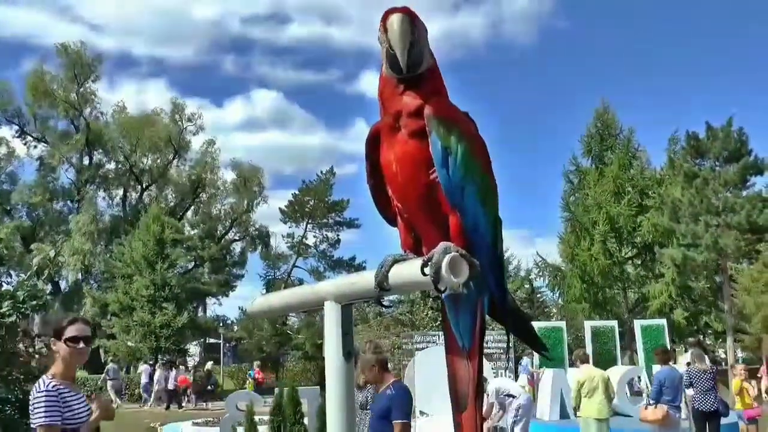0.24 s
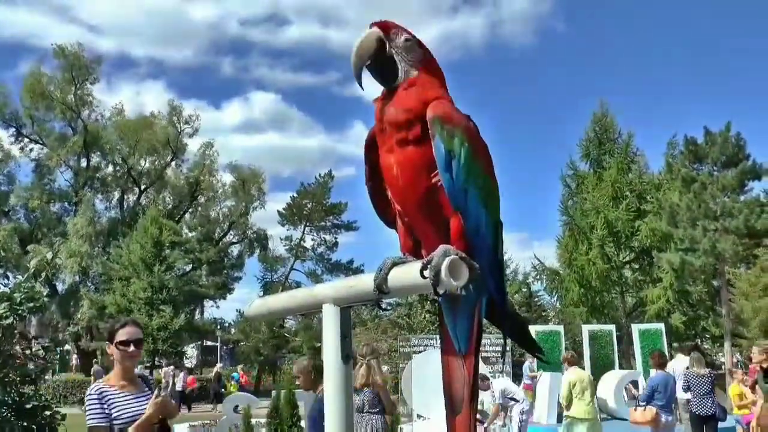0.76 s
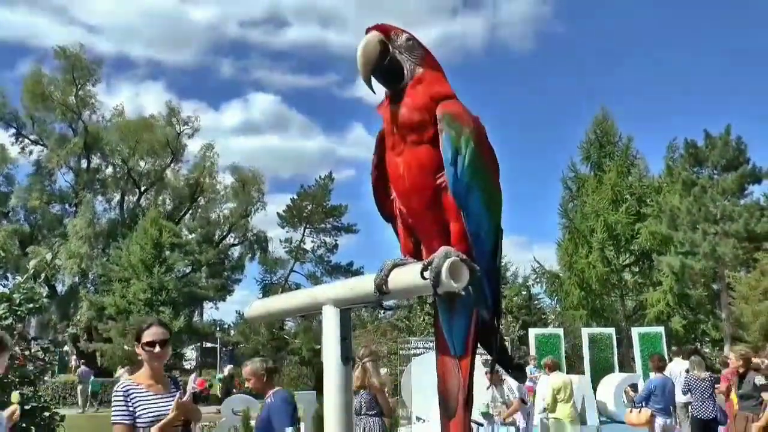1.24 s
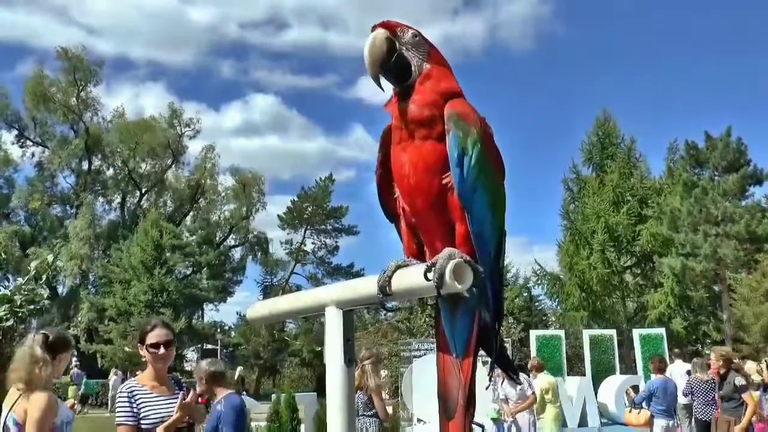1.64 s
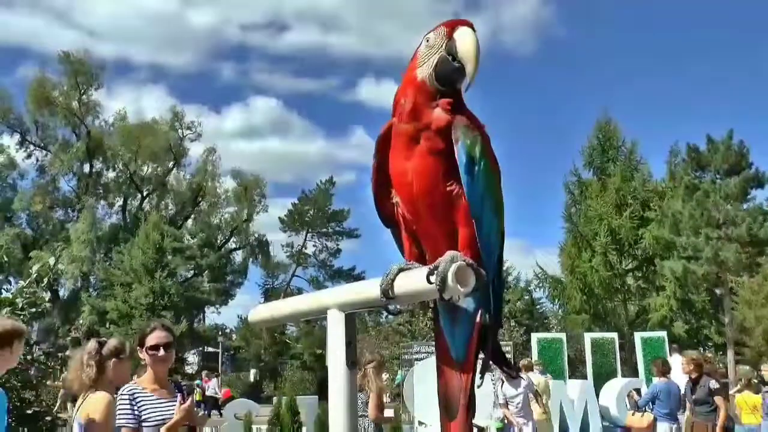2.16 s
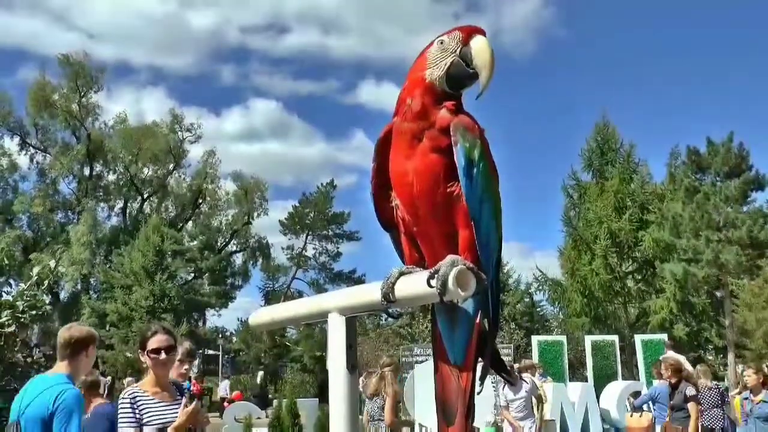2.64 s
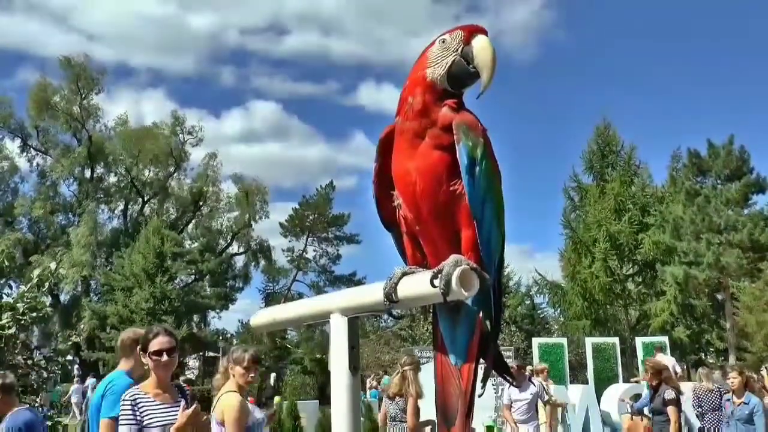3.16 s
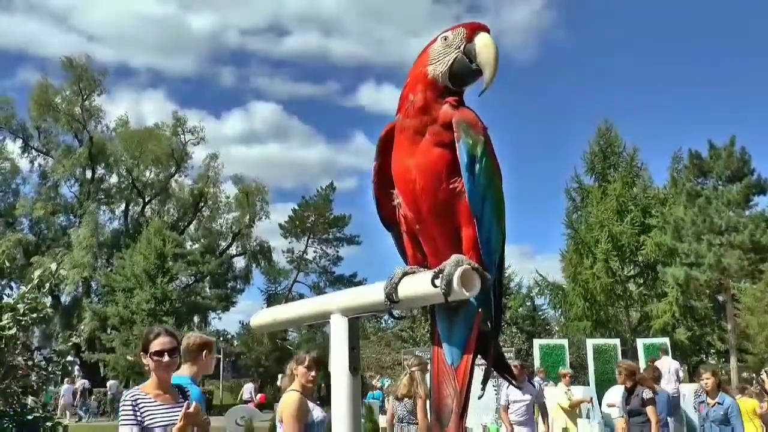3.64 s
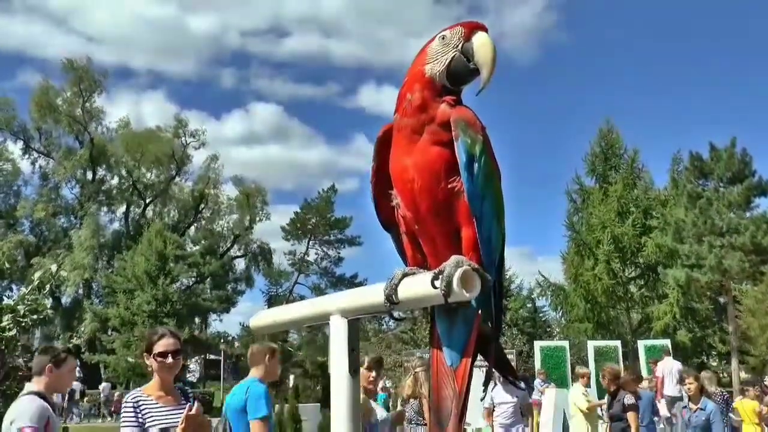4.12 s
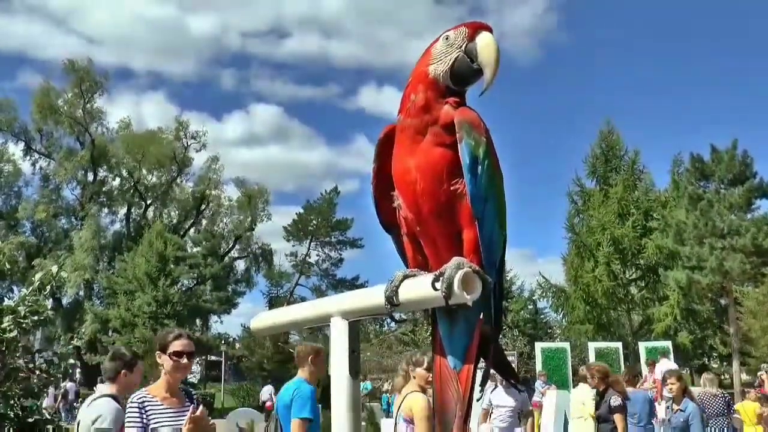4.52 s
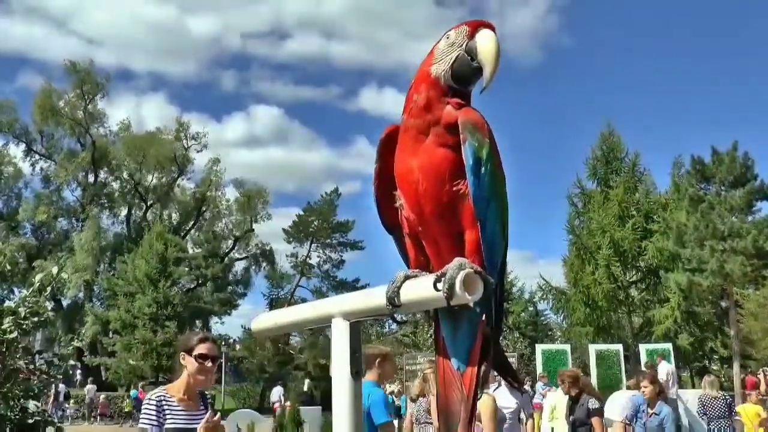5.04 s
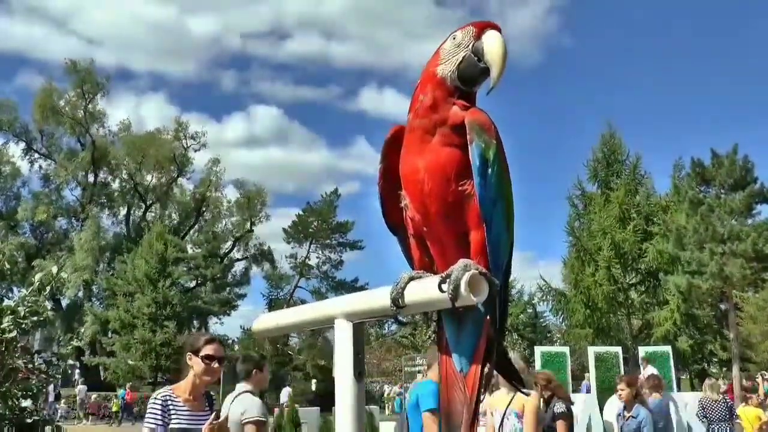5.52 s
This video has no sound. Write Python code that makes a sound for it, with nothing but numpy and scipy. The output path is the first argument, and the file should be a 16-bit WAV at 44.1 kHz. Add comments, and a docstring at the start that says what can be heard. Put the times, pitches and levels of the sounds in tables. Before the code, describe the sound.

A close macaw screech is already ending as the sound begins, its echo dying away into faint calls and still air. At about 1.2 seconds a nearby bird gives a low warble that climbs, trills and drops back, while a distant flock swells into blurred chatter. Short piping notes come around 1.6 seconds, then a harsh, raspy screech at 1.8. Tumbling squawks, more piping and a couple of thin, very high peeps crowd together until about 3.1 seconds. The flock then fades to soft, scattered calls. Another loud, rasping screech cuts through at about 4.2 seconds, followed by a brief high chirp. From 5 seconds to the end, near 5.8, quieter calls slide downward. The near birds sit slightly left of centre at the stereo microphone. The hard walls of a large aviary give each call a short echo, over a faint hiss.

```python
"""Parrots in a large aviary

Macaws screech close to the stereo microphone; other birds chatter, warble, pipe and peep around them.
Each note is a gliding reed tone coloured by the throat, and air rasps through the beak in a full screech.
Hard walls draw the calls out over the blur of the far flock, a faint hiss and still air."""
import sys
import numpy as np
from scipy import signal
from scipy.fft import rfft, irfft
from scipy.io import wavfile
from scipy.ndimage import uniform_filter1d

SR = 44100
rng = np.random.default_rng(int(sys.argv[2]) if len(sys.argv) > 2 else 0)


def output_pcm(signal):
    """Save a mono or channel-first signal as 16-bit PCM at the path in sys.argv[1].

    Samples are clipped to [-1, 1] before scaling.
    """
    pcm = np.clip(np.atleast_2d(signal).T, -1, 1) * 32767
    wavfile.write(sys.argv[1], SR, np.round(pcm).astype(np.int16))


N = 254898
LEAD_S = .3  # the birds are already calling before time zero
SPAN = N + int(LEAD_S * SR)
TOP_HZ = 15600

# Rise and fall of the far flock: time_s, level_db
FLOCK_LOUDNESS = [(0.0, -43.5), (0.19, -78), (0.4, -66), (0.9, -51), (1.29, -40), (1.48, -31),
                  (1.82, -31.5), (2.62, -38), (2.99, -40), (3.32, -52), (4.298, -50.5), (4.43, -54.5),
                  (4.72, -60.5), (5.34, -49), (5.78, -50.5)]


def undb(db):
    return 10 ** (np.asarray(db) / 20)


def on_log(hz, table):
    """Reads a table of frequency_hz, value on a log-frequency axis."""
    at, value = np.transpose(table)
    return np.interp(np.log(np.maximum(hz, 1)), np.log(at), value)


def unit(x):
    return x / np.sqrt(np.mean(x ** 2))


def coloured(size, spectrum):
    """Noise with the given spectrum, rms 1."""
    gain = undb(on_log(np.fft.rfftfreq(size, 1 / SR), spectrum))
    return unit(irfft(rfft(rng.standard_normal(size)) * gain, size))


def walk(size, rate):
    """Smooth random motion that changes about rate times a second, rms 1."""
    window = max(int(SR / rate), 1)
    smooth = uniform_filter1d(rng.standard_normal(size), window, mode="wrap")
    return unit(uniform_filter1d(smooth, window, mode="wrap"))


def place(out, sound, start_s, pan_db=2.5, rise_s=.0088):
    """Adds a sound with soft ends; pan_db is left minus right."""
    i, t = int((start_s + LEAD_S) * SR), np.arange(len(sound)) / SR
    ramp = np.clip(np.minimum(t / rise_s, (t[-1] - t) / .0042), 0, 1)
    out[:, i:i + len(sound)] += sound * np.sin(np.pi / 2 * ramp) ** 2 * undb([[pan_db / 2], [-pan_db / 2]])


def bed(spectrum, swell_db, flicker_db, width):
    """Stereo noise in bands two thirds of an octave apart, each swelling and flickering on its own."""
    out, hz = 0, np.fft.rfftfreq(N, 1 / SR)
    mid, side = rfft(rng.standard_normal((2, N))) * undb(on_log(hz, spectrum))
    pair = mid + width * side * np.array([[1], [-1]])
    lowest_hz, step = spectrum[0][0], 16
    points = N // step + 1
    for centre in lowest_hz * 2 ** np.arange(0, np.log2(TOP_HZ / lowest_hz), 2 / 3):
        octaves = np.log2(np.maximum(hz, 1) / centre)
        band = np.cos(np.pi / 2 * np.clip(1.5 * octaves, -1, 1)) ** 2
        swell = undb(swell_db * walk(points, 2 * step) + flicker_db * walk(points, 11 * step))
        out = out + np.repeat(swell, step)[:N] * irfft(band * pair, N)
    return unit(out) * undb([[1.2], [-1.2]])


def still_air():
    """The quiet room tone of the aviary."""
    # Colour of the air: frequency_hz, level_db
    spectrum = [(15, -55), (25, -21.5), (140, -15.5), (433, -4.5), (567, -4.5), (919, -2), (3930, -18),
                (4260, -11), (5280, -19), (9300, -28.5), (15500, -49.5)]
    return undb(-59) * bed(spectrum, swell_db=2, flicker_db=1.5, width=.9)


def treble_hiss():
    """A faint, wide hiss that comes and goes."""
    # Colour of the hiss: frequency_hz, level_db
    spectrum = [(5000, -20), (7000, 0), (11000, 0), (14000, 0), (15500, -14)]
    # Its rise and fall: time_s, level_db
    loudness = [(0., -77), (.45, -71), (.7, -94), (1.15, -65.5), (2.5, -66.5), (3.6, -66), (4.1, -83),
                (5., -65.5), (5.78, -69)]
    level_db = np.interp(np.arange(N) / SR, *np.transpose(loudness))
    return undb(level_db) * bed(spectrum, swell_db=2, flicker_db=2.5, width=1.1)


def far_flock():
    """Distant birds, blurred by the hall into flickering noise."""
    # Colour of the flock: frequency_hz, level_db
    spectrum = [(240, -50), (400, -26), (738, -5), (874, -22), (1180, 7.5), (1610, 3), (3340, -4.5),
                (4450, -26), (9000, -25), (11700, -24.5), (19800, -120)]
    level_db = np.interp(np.arange(N) / SR, *np.transpose(FLOCK_LOUDNESS)) - 12
    return undb(level_db) * bed(spectrum, swell_db=1.5, flicker_db=5, width=.68)


def hall(dry):
    """Hard walls return dense echoes that ring longest in the midrange."""
    # Time the echoes take to fall 60 dB: frequency_hz, decay_s
    decay = [(300, 0.45), (1000, 0.87), (3000, 0.73), (6000, 0.66), (13000, 0.38)]
    # Echo power common to both channels: frequency_hz, share
    likeness = [(400, 0.41), (1200, 0.11), (4000, 0.57), (12000, .05)]
    first_wall_s = .0039
    hz, t, cells = signal.stft(rng.standard_normal((3, int(1.2 * SR))), SR, nperseg=256)
    cells = cells * undb(-60 * t / on_log(hz, decay)[:, None])
    share = np.clip(on_log(hz, likeness), 0, 1)[:, None]
    tail = signal.istft(np.sqrt(share) * cells[0] + np.sqrt(1 - share) * cells[1:], SR, nperseg=256)[1]
    tail *= np.clip(np.arange(tail.shape[1]) / SR / first_wall_s - 1, 0, 1)
    tail /= np.sqrt(np.sum(tail ** 2, axis=1, keepdims=True))
    return undb(-1.5) * signal.fftconvolve(dry, tail, axes=1)[:, :dry.shape[1]]


def reed(hz, throat_hz, fall_db, far_db):
    """Harmonics of a moving pitch, strongest near the throat resonance, dulled by distance; rms 1."""
    k = np.arange(1, 13)[:, None]
    octaves = np.log2(k * hz / throat_hz)
    gain = undb(-fall_db * np.abs(octaves) - far_db * np.maximum(octaves, 0) ** 2) * (k * hz < TOP_HZ)
    phase = 2 * np.pi * np.cumsum(hz) / SR
    return unit(np.sum(gain * np.sin(k * phase), axis=0))


def sing(notes):
    """Gliding notes from membranes that waver in pitch and strength and beat unevenly."""
    out = np.zeros((2, SPAN))
    drift, waver, flutter, grit = (walk(SPAN, rate) for rate in (60, 300, 110, 1100))
    for row, note in enumerate(notes):
        start, length, first_hz, last_hz, db, throat_hz, fall_db, wobble_pct, hoarse_db, pan_db = note
        n = int(length * SR)
        faint_db = max(-35 - db, 0)  # faint notes come from far: duller, softer at the start
        own = (np.arange(n) + row * 4000) % SPAN  # each note wavers in its own way
        bend = 1 + .006 * drift[own] + (.003 + wobble_pct / 100) * waver[own]
        tone = reed(np.geomspace(first_hz, last_hz, n) * bend, throat_hz, fall_db, 3 + .4 * faint_db)
        hoarse = 1 + undb(hoarse_db) * grit[own]  # spreads a skirt around every harmonic
        level = undb(db + 4.47 * np.tanh(flutter[own]))
        place(out, tone * hoarse * level, start, pan_db, rise_s=.0082 + .0008 * faint_db)
    return out


def chatter(count=150):
    """Short bent squawks from the far flock at random moments."""
    notes = []
    for when, pitch, distance, glide, throat, duration in rng.random((count, 6)):
        start, length = 5.6 * when, .02776 + .0623 * duration
        db = np.interp(start, *np.transpose(FLOCK_LOUDNESS)) - 3.5 - 8 * distance
        first_hz = 450 * 2 ** (2 * pitch)
        last_hz = first_hz * 2 ** (.5 * glide - .3)
        throat_hz = 1000 * 2 ** (1.574 * throat)
        notes.append((start, length, first_hz, last_hz, db, throat_hz, 12, 5, -8, 3))
    return sing(notes)


def peeps(pitch_hz=10500):
    """A small bird gives thin, slightly wavering tones."""
    # Each peep: start_s, length_s, level_db
    times = [(2.28, 0.089, -50.5), (2.725, 0.098, -54.5), (3.31, 0.076, -72), (4.098, 0.067, -64.5)]
    out, waver = np.zeros((2, SPAN)), walk(SPAN, 69)
    for start, length, db in times:
        hz = pitch_hz * (1 + .0093 * waver[:int(length * SR)])
        place(out, undb(db) * reed(hz, pitch_hz, fall_db=18, far_db=0), start)
    return out


def warble():
    """A near bird climbs an octave, rolls its pitch up and down at a quickening rate and drops back."""
    # Course of the call: time_s, middle_pitch_hz, level_db
    course = [(1.155, 319.6, -56), (1.18, 344.7, -42), (1.215, 488.2, -46.5), (1.23, 639, -57.5),
              (1.262, 741.5, -41.5), (1.29, 733.3, -36), (1.339, 744.4, -32), (1.398, 749, -26),
              (1.402, 579.5, -35.5), (1.415, 428, -30), (1.438, 395.4, -25.5), (1.452, 383, -47),
              (1.486, 372, -61)]
    roll_from_s, roll_to_s, depth_hz, swell_db = 1.261, 1.399, 103.6, 4
    out, (times, hz, db) = np.zeros((2, SPAN)), np.transpose(course)
    t = np.arange(times[0], times[-1], 1 / SR)
    rate_hz = np.interp(t - roll_from_s, [0, .05], [8.3, 34]) * (t > roll_from_s)
    rolling = np.clip((t - roll_from_s) / .02 + 1, 0, 1) * (t < roll_to_s)
    swing = rolling * np.cos(2 * np.pi * np.cumsum(rate_hz) / SR)
    pitch = uniform_filter1d(np.interp(t, times, hz) + depth_hz * swing, size=200)
    pitch *= 1 + .02 * walk(len(t), 350)
    hoarse = 1 + undb(-16) * walk(len(t), 500)
    level = undb(np.interp(t, times, db) + swell_db * swing)
    tone = reed(pitch, throat_hz=np.minimum(1100, 2.53 * pitch), fall_db=11, far_db=2)
    place(out, tone * hoarse * level, times[0])
    return out


def repeated(pattern, times):
    """Lays out a call's notes at each of its times, stretched, transposed and set in level."""
    return [(start + stretch * at, stretch * length, pitch * first, pitch * last, db + note_db, *throat)
            for start, stretch, pitch, db in times for at, length, first, last, note_db, *throat in pattern]


def voiced(notes, wobble_pct, hoarse_db, pan_db):
    """Gives notes a caller's voice: the throat follows the pitch; wide glides and rich notes wobble more."""
    rows = []
    for start, length, first_hz, last_hz, db, throat_ratio, fall_db in notes:
        throat_hz = throat_ratio * np.sqrt(first_hz * last_hz)
        wobble = wobble_pct + 1.2 * abs(np.log2(last_hz / first_hz)) + .6 * max(9 - fall_db, 0)
        rows.append((start, length, first_hz, last_hz, db, throat_hz, fall_db, wobble, hoarse_db, pan_db))
    return rows


def parrots():
    """The calls that stand out from the flock: single notes, screeches, piping and tumbling figures."""
    # Lone notes, then the notes within each kind of call:
    # start_s, length_s, first_hz, last_hz, level_db, throat_to_pitch_ratio, fall_db_per_octave
    singles = [ (-.16, 0.11, 3845, 3780, -25.5, 1.01, 14.5), (-.1, 0.036, 3380, 3260, -41, .96, -7.5),
               (-.06, .08, 2337, 2495, -43, 1.02, 10), (-.03, 0.029, 3140, 3144, -30.5, .98, 14),
               (-.03, 0.097, 3637, 3659, -34, 1.04, 24.5), (0., 0.24, 445, 433, -66, 1.02, 31.5),
               (.58, 0.11, 4210, 4230, -69, 1., 40), (.81, 0.07, 2990, 2970, -69.5, 1., 20),
               (.89, 0.1, 699, 736, -56, 1.5, 3), (1.02, 0.13, 1102, 987, -53.5, 1.5, 1.5),
               (1.503, 0.03, 2890, 2820, -38.5, 1., 28), (1.53, 0.057, 1924, 1810, -33, 1., 16.5),
               (1.61, .084, 2254, 2380, -35.5, 1., 43), (2., 0.048, 4400, 4480, -32, 1.03, 8.5),
               (2.08, 0.078, 828, 838, -29.5, 2.01, 25), (2.28, 0.064, 1760, 1259, -31.5, 1.09, 25),
               (2.55, 0.019, 1290, 507, -47, 1.25, 9), (2.755, 0.037, 2470, 2417, -36, 1., 8.5),
               (2.61, 0.036, 1163, 1140, -40.5, 1.3, 24), (2.865, 0.076, 2271, 2536, -29.5, 1.35, 12),
               (2.885, 0.12, 6136, 6534, -28, 1.04, 12), (2.925, 0.024, 1302, 854, -40.5, .93, -4),
               (2.95, 0.072, 2911, 2858, -27, .97, 60), (3.035, 0.049, 2330, 1884, -29, 1.1, 16),
               (3.52, 0.12, 2504, 2442, -44.5, 1., 4.5), (3.595, 0.037, 2090, 2017, -45.5, .94, 7.5),
               (3.79, 0.035, 1803, 1736, -50, 1., -2), (3.8, 0.17, 2890, 2786, -56, 1.02, 6),
               (3.87, 0.043, 1460, 1375, -63.5, 1.03, 21.5), (3.92, .3, 3433, 3216, -58.5, 1., 5),
               (4.08, 0.14, 4240, 4100, -62.5, 1., 14), (4.25, 0.079, 5280, 4770, -34.5, 1., 15),
               (4.555, 0.033, 3890, 3815, -33, 1., 33), (4.85, 0.14, 2480, 2630, -60, 1., 4),
               (4.915, 0.091, 1578, 1575, -53.5, 1.03, 4.5), (5.02, 0.13, 1725, 1348, -50.5, 1.1, 0.5),
               (5.215, 0.088, 1322, 1210, -49, 1., 30), (5.26, .12, 1185, 882.5, -44, .95, 8),
               (5.42, 0.096, 849, 516, -49.5, 1.3, 6), (5.472, 0.045, 3270, 3230, -55.5, 1., 2),
               (5.632, 0.011, 2310, 2250, -43, 1., 10), (5.685, 0.04, 2193, 2220, -55.5, 1.03, 18)]
    screech = [(0, 0.0362, 2500, 2762, -8.5, 1.95, 49), (.013, 0.0238, 2890, 3244, -1, 1.05, 10),
               (.032, 0.0346, 3290, 3462, 1.5, 1.42, 27), (.06, .23, 3900, 3870, -1.5, 1.02, 16),
               (.14, 0.099, 3090, 3090, -2, 1.08, 6)]
    piping = [(0, 0.044, 2387, 2459, -0.19, 0.9, 43), (.018, 0.038, 1467, 1475, -0.6, 1.493, 23),
              (.155, .06, 1810, 1660, 0, 1.04, 40), (.205, 0.031, 2250, 2100, -1.2, 1.04, 47)]
    tumble = [(0, 0.026, 604, 576, -16.5, 1.4, 4.6), (.028, 0.045, 2510, 1350, -1.5, 1.177, 30),
              (.048, 0.02, 2840, 2810, -3, 1., 26), (.148, .042, 759.6, 1726, -2.5, 1.41, 10)]
    # Each time a call is given: start_s, time_stretch, pitch_ratio, level_db
    screech_times = [(1.845, 0.99, 1.005, -28), (4.24, 0.96, .995, -26.5)]
    piping_times = [(1.583, .97, 1., -27.5), (2.389, 1.1, 1.04, -30)]
    tumble_times = [(1.89, 1., 0.99, -27.5), (2.73, 1.13, 0.97, -31.5)]
    return sing(voiced(singles, wobble_pct=.6, hoarse_db=-12, pan_db=4)
                + voiced(repeated(screech, screech_times), wobble_pct=.5, hoarse_db=-11, pan_db=2.5)
                + voiced(repeated(piping, piping_times), wobble_pct=1.1, hoarse_db=-13, pan_db=6)
                + voiced(repeated(tumble, tumble_times), wobble_pct=1, hoarse_db=-12, pan_db=7))


def beak_rasp():
    """Air flutters through the open beak in a full screech."""
    # Colour of the rushing air: frequency_hz, level_db
    spectrum = [(880, -86), (1500, -34), (3090, -4.5), (3650, -46), (3990, 6), (4710, -11), (6690, -3),
                (7380, -45), (8050, -13.5), (13200, -18.5), (14200, -38.5), (15500, -42)]
    # Each rush of air: start_s, length_s, level_db
    blasts = [(-.2, 0.25, -38), (1.837, 0.23, -35), (2.388, 0.091, -49.5), (4.232, 0.2, -33.5),
              (5.469, 0.11, -63.5)]
    out, air, flutter = np.zeros((2, SPAN)), coloured(SPAN, spectrum), walk(SPAN, 69)
    for start, length, db in blasts:
        own = np.arange(int(length * SR)) + int((start + LEAD_S) * SR)
        place(out, air[own] * undb(db + 5.7 * np.tanh(flutter[own])), start, rise_s=.032)
    return out


def scene():
    """At the microphone: near birds arrive direct and as echo, the far chatter mostly as echo."""
    calls, near, far = parrots() + beak_rasp() + peeps(), warble(), chatter()
    direct = undb(-2.5) * calls + near + undb(-15.5) * far
    echoes = hall(calls + far + undb(-5) * near)
    low_cut = signal.butter(4, 330, "high", fs=SR, output="sos")  # small bodies radiate no bass
    birds = signal.sosfilt(low_cut, direct + echoes)
    return birds[:, -N:] + far_flock() + treble_hiss() + still_air()


def record(dry):
    """The recorder cuts the top of the treble steeply."""
    return signal.sosfilt(signal.ellip(14, .2, 70, TOP_HZ, fs=SR, output="sos"), dry)


dry = scene()
out = record(dry)
output_pcm(out)
```